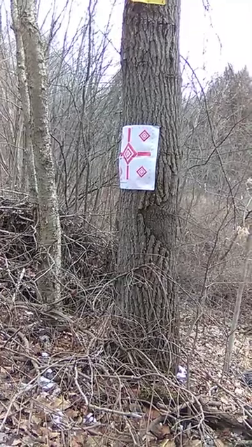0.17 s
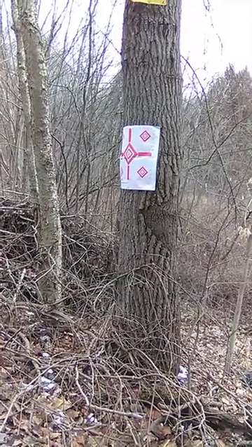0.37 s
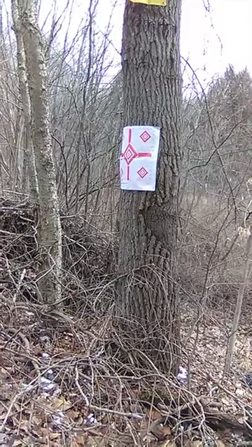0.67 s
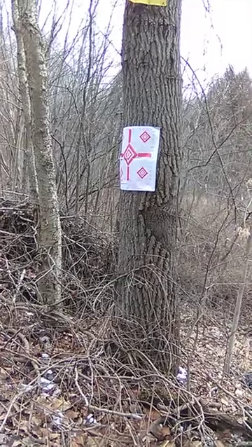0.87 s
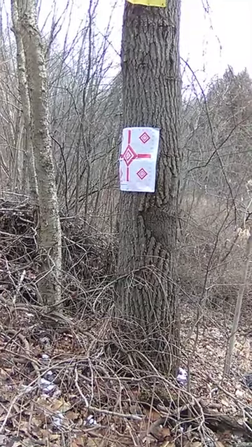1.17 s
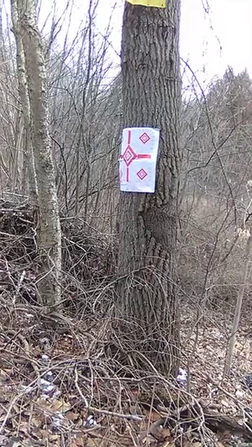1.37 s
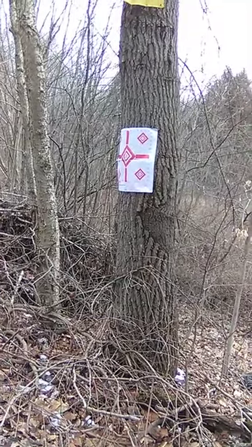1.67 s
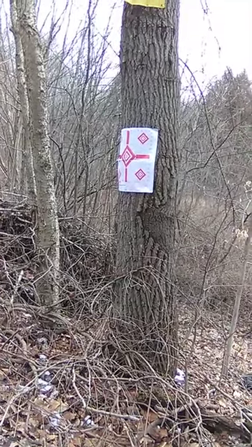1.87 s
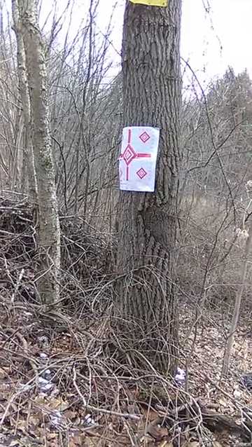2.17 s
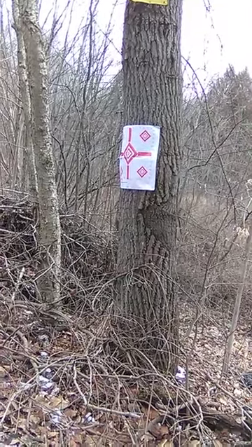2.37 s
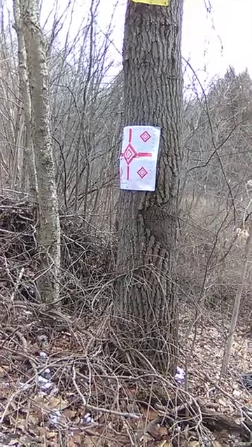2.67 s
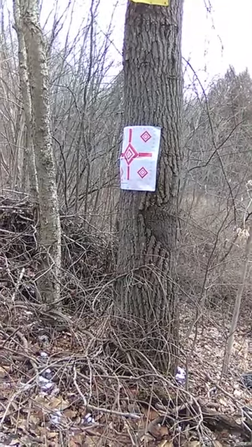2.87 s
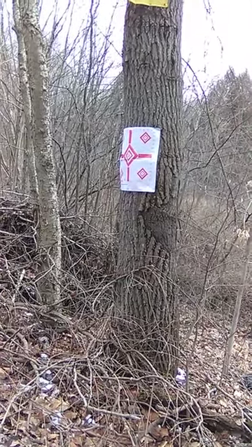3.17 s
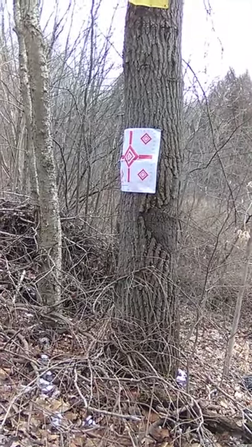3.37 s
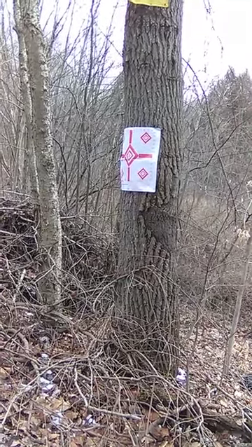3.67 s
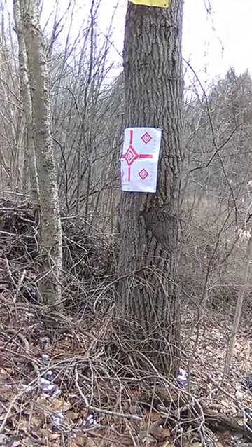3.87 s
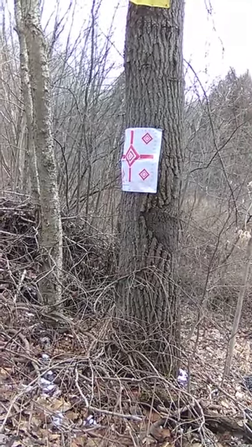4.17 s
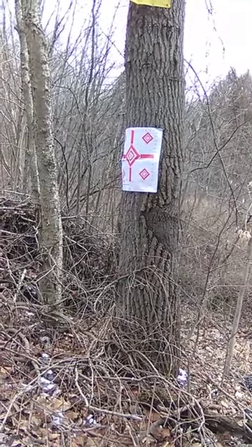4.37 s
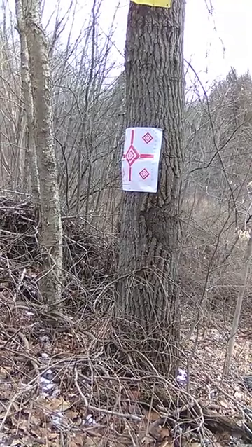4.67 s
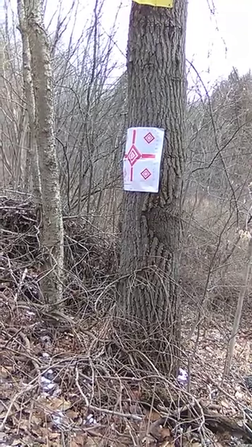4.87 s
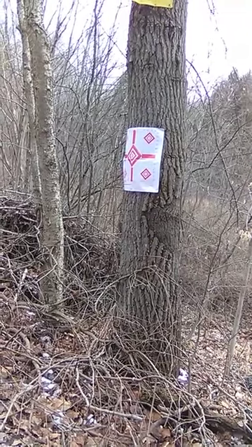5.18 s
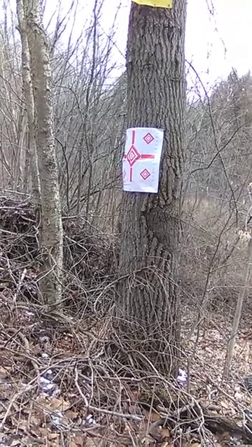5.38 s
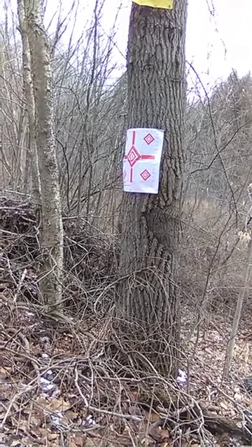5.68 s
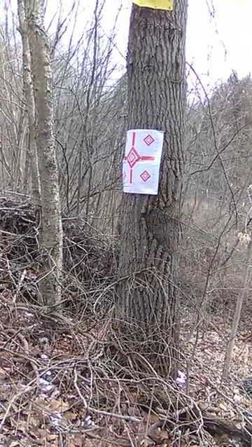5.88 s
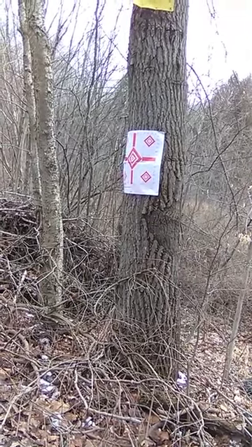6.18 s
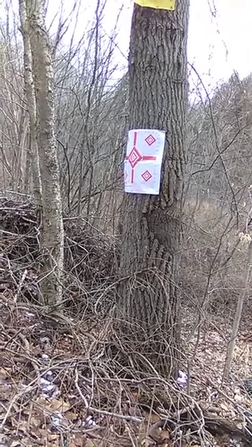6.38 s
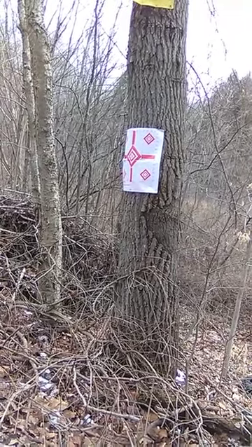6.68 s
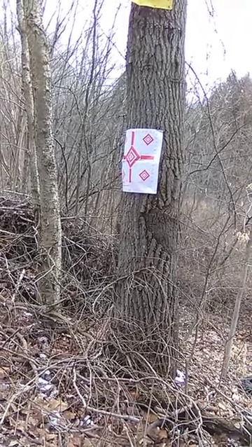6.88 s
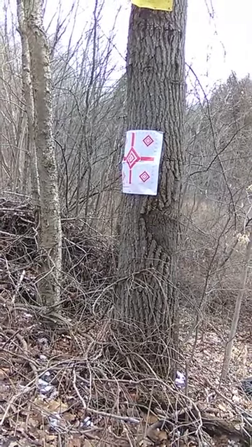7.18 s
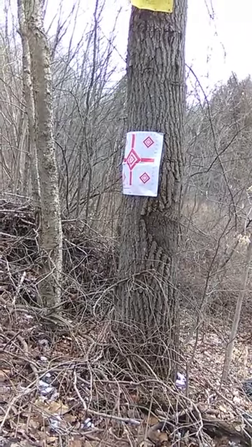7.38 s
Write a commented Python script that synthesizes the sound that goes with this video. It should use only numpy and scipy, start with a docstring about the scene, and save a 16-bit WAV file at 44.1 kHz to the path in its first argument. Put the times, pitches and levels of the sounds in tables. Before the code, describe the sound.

Outdoors, spaced air-pistol shots snap and spit gas, pellets crack on paper and bark, echoes scatter through trunks, and early wind rumbles against the microphone.

```python
"""The woods still echo an earlier shot; then a gas-powered air pistol fires at paper on a tree, near a small camera.
Each shot is a hammer rush, valve puffs of ringing and hiss, mostly a pellet smack, then noise tails off the trunks.
Trigger and action click between shots; early on something lands in dry leaves and later there is one dull tap.
Lumpy low noise buffets mostly the left port and largely dies down after 4.3 s; the loudest peaks overload.
Throughout, faint air stirs, a far tone wavers and the camera electronics whine on and off."""
import sys
import numpy as np
from scipy import signal
from scipy.fft import rfft, irfft, next_fast_len
from scipy.io import wavfile
from scipy.ndimage import uniform_filter1d

SR = 44100
rng = np.random.default_rng(int(sys.argv[2]) if len(sys.argv) > 2 else 0)


def amplitude_ratio(level_db):
    """Convert a level in decibels to the matching linear amplitude (field) ratio."""
    exponent = np.asarray(level_db, float) / 20
    return 10 ** exponent


def pcm_store(signal):
    """Save signal as 16-bit PCM."""
    levels = np.round(np.clip(np.atleast_2d(signal), -1, 1) * 32767)
    wavfile.write(sys.argv[1], SR, levels.astype(np.int16).T)


N = 332514
LEAD_S = .2  # rendered before time zero, for the echo of an earlier shot
LONG = N + round(LEAD_S * SR)


def evened(x):
    """Scales to rms 1."""
    return x / np.sqrt(np.mean(x ** 2) + 1e-20)


def smooth_noise(shape, size):
    """Moving average of white noise, at rms 1."""
    return evened(uniform_filter1d(rng.standard_normal(shape), size=size))


def read(points, hz):
    """Reads a spectrum table on a log frequency axis."""
    f, value = np.transpose(points)
    return np.interp(np.log(hz + 1), np.log(f + 1), value)


def add(mix, s, sound):
    """Adds a two-channel sound at time s."""
    part = mix[:, round((s + LEAD_S) * SR):][:, :sound.shape[1]]
    part += sound[:, :part.shape[1]]


def panned(db):
    """Gains of the two ports for a left-right level difference."""
    return amplitude_ratio(np.multiply.outer([.5, -.5], db))


def hiss(size, colour, treble_db=0, balance=None, alike=None):
    """Two-port noise of a given spectrum at rms 1; the treble tilt is half reached at 3.4 kHz."""
    # port level difference: freq_hz, left_minus_right_db
    ports = [(200, -2), (1270, 5), (2330, 5), (4300, 3), (7910, -7), (14600, 1)]
    # port correlation: freq_hz, likeness (-1..1)
    likeness = [(400, .92), (800, 0.23), (1400, 0)]
    balance = ports if balance is None else balance
    alike = likeness if alike is None else alike
    fast = next_fast_len(size)
    hz = np.fft.rfftfreq(fast, 1 / SR)
    left, other = rfft(rng.standard_normal((2, fast)))
    same = np.clip(read(alike, hz), -1, 1)
    pair = np.array([left, same * left + np.sqrt(1 - same ** 2) * other])
    tilt_db = treble_db * hz ** 4 / (hz ** 4 + 3400.0 ** 4)
    gain = amplitude_ratio(read(colour, hz) + tilt_db) * panned(read(balance, hz))
    return evened(irfft(pair * gain, fast)[:, :size])


def blow(t, t60, rise):
    """Envelope: a 60 dB swell in rise s up to t = 0, then exponential decay."""
    return amplitude_ratio(np.where(t < 0, 60 * t / rise, -60 * t / t60))


def ring(t, hz, t60):
    """A damped mode that starts at t = 0."""
    return (t > 0) * amplitude_ratio(-60 * abs(t) / t60) * np.sin(2 * np.pi * hz * t)


def shot():
    """Hammer rush, then valve puffs: each a low push, a barrel ring and a jet of hiss."""
    # hammer bounces on the valve: after_s, push_db, barrel_ring_db, hiss_db
    puffs = [(.0004, -18, -6.5, -7), (.0022, -12, -11, -10), (.0076, -7.5, -10, -8), (0.013, -8, -9, -8),
             (.0184, -21, -17, -14.5)]
    # jet spectrum: freq_hz, relative_db_per_hz
    jet = [(150, -20), (300, -2.5), (520, -4), (620, -14), (1300, -4), (1930, -2), (2560, -8), (3760, -.4),
           (5660, -6), (9110, -5), (12200, -16.5), (14200, -15), (15000, -32)]
    push_hz, push_t60_s = 390, .012
    barrel_hz, barrel_t60_s = 790, .022
    thump_hz, thump_t60_s = 145, .05
    t = np.arange(4096) / SR - .01
    at = t - np.array([[0], [.00015]])  # the left port is nearer
    body, jet_power = 0, 0
    for s, push_db, barrel_db, hiss_db in puffs:
        push = amplitude_ratio(push_db) * ring(at - s, push_hz, push_t60_s)
        barrel = amplitude_ratio(barrel_db) * panned(2.1)[:, None] * ring(at - s, barrel_hz, barrel_t60_s)
        body = body + push + barrel
        jet_power = jet_power + (amplitude_ratio(hiss_db) * blow(t - s, .045, .002)) ** 2
    rush = amplitude_ratio(-16) * blow(t, .03, .012) * np.clip((t + .005) / .003, 0, 1)
    scatter = amplitude_ratio(-12) * blow(t - .012, .14, .02)  # nearby trunks and ground fill in behind the puffs
    thump = amplitude_ratio(-19) * ring(at, thump_hz, thump_t60_s)
    shape = np.sqrt(jet_power + rush ** 2 + scatter ** 2)
    return thump + body + shape * hiss(len(t), jet, 1.5)


def smack(db, treble_db):
    """Pellet on target: a crack on the paper, then its rattle and the bark crumbs, as decaying noise."""
    # impact spectrum: freq_hz, relative_db_per_hz
    spectrum = [(410, -44), (1200, -16), (1930, -.5), (2600, -8), (3900, -1.5), (8210, -10), (15000, -40)]
    t = np.arange(4096) / SR - .002
    crack = blow(t, .018, 0.0025)
    rattle = amplitude_ratio(-5.5) * blow(t, .11, 0.0051)
    return amplitude_ratio(db) * (crack + rattle) * hiss(len(t), spectrum, treble_db)


def click(db, treble_db, scrape_t60_s=.09):
    """A snap and a short scrape through the resonances of the pistol frame, left of the camera."""
    # frame resonances: centre_hz (before the random shift), width_hz, level_db
    frame = [(1426, 490, -5), (1804, 300, -0.5), (3490, 1000, 1), (5060, 990, -3.5), (7170, 2300, -5),
             (9530, 1400, -9)]
    t = np.arange(4096) / SR - .002
    hz = np.geomspace(100, 16000, num=200)
    shift = rng.uniform(.9, 1.1)  # each click has slightly shifted resonances, drawn at random
    power = sum(amplitude_ratio(d) ** 2 / (1 + (2 * (hz - shift * f) / w) ** 2) ** 1.2 for f, w, d in frame)
    power = power / (1 + (1150 / hz) ** 6)  # bass cut
    colour = np.c_[hz, 10 * np.log10(power)]
    grain = amplitude_ratio(4.0 * smooth_noise(len(t), 60))  # the scrape catches and slips
    snap = 1.2 * blow(t, .018, .002)
    scrape = amplitude_ratio(-3.5) * grain * blow(t - .004, scrape_t60_s, .03) * (t > -.001)
    return amplitude_ratio(db) * (snap + scrape) * hiss(len(t), colour, treble_db, [(2000, 7.5), (8000, 2.5)])


def sear(db):
    """The sear lets go: a dull ring of the frame modes with a faint snap on top."""
    # frame modes: freq_hz, level_db, t60_s
    modes = [(780, -9, .025), (1250, -3, .016), (1650, 0, .018)]
    t = np.arange(4096) / SR - .002
    knock = sum(amplitude_ratio(d) * ring(t, hz, t60) for hz, d, t60 in modes) * np.clip(t / .0008, 0, 1)
    return amplitude_ratio(db) * (panned(7)[:, None] * knock + click(-9.5, -10.5, .07))


def rustle():
    """Something lands in dry leaves: a dull knock, then grainy noise that swells, sags and dies away."""
    # leaf spectrum: freq_hz, relative_db_per_hz
    leaves = [(400, -20), (1600, -11), (3400, -2), (5600, -2), (8000, -9), (14000, -30)]
    # knock modes: freq_hz, relative_db, t60_s
    modes = [(720, -2, .08), (1650, -8, .06)]
    level_db, length_s, t60_s = -22, .036, .18
    t = np.arange(16384) / SR
    grain = evened(amplitude_ratio(3.5 * smooth_noise(len(t), 40)))
    arch = amplitude_ratio(-5.0 * (t / (.45 * length_s) - 1) ** 2)
    tail = .4 * blow(t - length_s, t60_s, 1)
    shape = np.minimum(t / 0.0012, 1) * np.where(t < length_s, arch, tail)
    knock = sum(amplitude_ratio(d) * ring(t, hz, mode_t60_s) for hz, d, mode_t60_s in modes)
    return amplitude_ratio(level_db) * (shape * grain * hiss(len(t), leaves) + knock)


def dull_tap():
    """A single damped mode, equal at both ports."""
    return amplitude_ratio(-29) * ring(np.arange(2048)[None] / SR, hz=700, t60=.016)


def woods(x):
    """Scatter from many trunks: noise tails whose bands die at their own speed."""
    # tail decay: freq_hz, t60_s
    decay = [(300, .5), (800, .8), (1900, .82), (4590, .62), (12000, .46)]
    # tail spectrum: freq_hz, relative_db
    strength = [(400, -23), (1200, -18), (1900, -19), (2600, -13), (3800, -16), (9000, -20), (14000, -21)]
    turn = np.arange(LONG) / SR * 1.4  # rad; the mix of tails turns slowly, so each sound echoes differently
    out = 0
    for k in range(3):
        hz, t, z = signal.stft(hiss(SR, [(1, 0)]), SR, nperseg=256)
        tail_db = -60 * t / read(decay, hz)[:, None] + read(strength, hz)[:, None]
        z = z * amplitude_ratio(tail_db) * np.clip(t / 0.028, 0, 1)
        tail = signal.istft(z, SR, nperseg=256)[1] / 50
        share = np.sqrt(2 / 3) * np.cos(turn + k * np.pi / 3)
        out = out + signal.fftconvolve((share * x.mean(0))[None], tail, axes=1)[:, :LONG]
    return out


def slap(edge_db, lump_db):
    """A single eddy pushes the left port suddenly: a soft edge, then a few slow swings."""
    t = np.arange(6144) / SR - .002
    lump = amplitude_ratio(lump_db) * ring(t, hz=80, t60=.11) * np.clip(t / .01, 0, 1)
    edge = amplitude_ratio(edge_db) * ring(t, hz=200, t60=.04)
    soften = signal.butter(4, 600, fs=SR, output="sos")
    return -2 * signal.sosfilt(soften, lump + edge) * np.array([[1], [0]])


def wind():
    """Lumps of low pressure, almost unrelated at the two ports; crests of strong lumps reach higher in pitch."""
    # steady breeze: time_s, left_db, right_db
    breeze = [(0, -25, -48), (.7, -30, -32), (1.2, -28, -39), (1.6, -31, -30), (2.1, -35, -52),
              (3.0, -28, -33), (4.2, -31, -39), (4.3, -46, -46), (4.73, -62, -40), (4.78, -62, -58),
              (5.2, -60, -60), (6.2, -58, -45), (7.0, -60, -60)]
    # gusts on the left port: start_s, length_s, level_db
    gusts = [(.13, .32, -19), (.68, .41, -18), (1.14, .13, -18), (1.34, .08, -16), (1.88, .17, -18),
             (2.25, .46, -21), (2.97, .1, -19.5), (3.39, .2, -22), (3.83, .29, -21), (4.88, .19, -38),
             (5.23, .15, -29), (5.44, .13, -37), (5.81, .04, -38), (6.15, .03, -40)]
    # buffet spectrum: freq_hz, relative_db_per_hz
    buffet = [(22, -34), (53, 1.5), (80, 2.5), (204, -15.5), (600, -40), (1200, -100)]
    gust_rise_s, gust_t60_s = .12, .2  # a gust swells 60 dB in the rise time, holds, then dies away
    t = np.arange(LONG) / SR - LEAD_S
    times, *ports_db = np.transpose(breeze)
    level = amplitude_ratio(np.array([np.interp(t, times, db) for db in ports_db]))
    for s, length, db in gusts:
        gust = amplitude_ratio(db) * blow(t - np.clip(t, s, s + length), gust_t60_s, gust_rise_s)
        level[0] = np.maximum(level[0], gust)
    lumps = evened(uniform_filter1d(uniform_filter1d(rng.standard_normal((2, LONG)), size=1200), size=1200))
    air = hiss(LONG, buffet, 0, [(1, 0)], [(1, .1)])
    low = signal.sosfilt(signal.butter(2, 140, fs=SR, output="sos"), air)
    swell = low * evened(amplitude_ratio(1.5 * lumps))
    crests = evened(uniform_filter1d(swell ** 2, size=200) ** .85)
    whip = (air - low) * np.minimum(crests, 3.8) * (level / amplitude_ratio(-23)) ** .55
    return level * 3.5 * np.tanh((swell + whip) / 3.5)  # the tallest lumps are gently rounded off


def distant_air():
    """Faint coloured noise whose level drifts."""
    # air spectrum: freq_hz, relative_db_per_hz
    spectrum = [(90, -30), (150, -10), (400, -19), (850, -14), (1300, -28), (1950, -29), (2600, -36),
                (8200, -33), (14000, -40)]
    drift = amplitude_ratio(2.2 * smooth_noise(LONG, 4000))
    return amplitude_ratio(-67.5) * drift * hiss(LONG, spectrum)


def far_tone():
    """A far wavering tone: noise in a narrow band, nearly alike at both ports."""
    hz, width_hz, level_db = 669, 11, -75
    band = [(hz - 5 * width_hz, -60), (hz - width_hz, -6), (hz, 0),
            (hz + width_hz, -6), (hz + 5 * width_hz, -80)]
    return amplitude_ratio(level_db) * hiss(LONG, band, alike=[(1, .9)])


def electronics_whine():
    """Two flickering tones, mostly at the right port, that hold for spells and otherwise blip steadily."""
    # tones: freq_hz, rms_db (before flicker and panning)
    whine = [(8000, -82.5), (14002, -83)]
    # spells when the whine holds: on_s, off_s
    busy = [(0, .1), (.39, .72), (2.83, 3.32), (4.24, 5.28)]
    blip_every_s, blip_s, first_blip_s = .32, .025, .07
    t = np.arange(LONG) / SR - LEAD_S
    spells = [(t > a) & (t < b) for a, b in busy]
    blips = (t - first_blip_s) % blip_every_s < blip_s
    on = uniform_filter1d(1. * np.any(spells + [blips], axis=0), size=300)
    flicker = amplitude_ratio(3.5 * smooth_noise(LONG, 900))
    tones = sum(amplitude_ratio(d) * np.sqrt(2) * np.sin(2 * np.pi * f * t) for f, d in whine)
    return on * flicker * tones * panned(-20)[:, None]


def scene():
    """Pistol, target and leaves sound into the woods; slaps, wind and background lie on top."""
    # shots: time_s
    shots = [-.09, .673, 1.4474, 2.1814, 2.957, 3.7709, 6.3501, 7.107]
    # pellet on paper and bark: time_s, level_db, treble_db
    smacks = [(0.7133, -9, 1.5), (1.49, -14, .4), (2.2239, -11, 4.5), (2.9999, -14.5, -1.5),
              (3.8133, -10, -2.1), (6.3941, -11, -4)]
    # trigger and action, and the crackle on the dull tap at 2.548 s: time_s, level_db, treble_db
    clicks = [(0.2463, -39.5, -8.5), (0.3287, -60, 8), (.5377, -55, -8), (0.5636, -38.5, -7),
              (0.9073, -39, -7), (1.3149, -38, -7.5), (1.6985, -39.5, -6), (2.0293, -44, -4.5),
              (2.0517, -37, -10.5), (2.4289, -40.5, -8.5), (2.548, -47, -10), (2.824, -54, -3.5),
              (2.8923, -38, -9.5), (3.2725, -39.5, -8.5), (3.4361, -52, -15.5), (3.6406, -28, -3.5),
              (3.7179, -38, -5), (3.9953, -32.5, -6), (4.0367, -41, -6.5), (4.0701, -37.5, -16.5),
              (4.4514, -56, 6), (4.4727, -46.5, 11.5), (4.5121, -35.5, -9), (4.6992, -58, -3.5),
              (6.7326, -39.5, -11), (6.7735, -40, -6), (6.9686, -51, .1), (7.0444, -38.5, -8.5),
              (7.4859, -40.5, -8.5)]
    # sear releases: time_s, level_db
    sears = [(1.4257, -20), (2.169, -21), (2.9342, -20), (3.7519, -15), (4.7591, -24), (7.0843, -19)]
    # eddies on the left port: time_s, edge_db, lump_db (both before doubling)
    slaps = [(1.254, -15, -17), (1.544, -10, -11), (1.837, -22, -3.5), (1.962, -20, -18), (2.665, -16, -15),
             (2.872, -22, -6.5), (3.208, -21, -13), (3.907, -20, -12)]
    loud, small, port = np.zeros((3, 2, LONG))
    for s in shots:
        add(loud, s - .01, shot())  # each sound starts ahead of its own t = 0
    layers = ((loud, smacks, smack), (small, clicks, click), (small, sears, sear), (port, slaps, slap))
    for mix, rows, source in layers:
        for s, *row in rows:
            add(mix, s - .002, source(*row))
    add(loud, 1.8015, rustle())
    add(small, 2.548, dull_tap())
    echo = woods(loud + amplitude_ratio(-4) * small)  # small clicks reach the trunks less than the blast
    background = distant_air() + far_tone() + electronics_whine()
    return (loud + small + echo + port + wind() + background)[:, -N:]


def band_limit(x):
    """A steep low-pass at the top of the band."""
    return signal.sosfilt(signal.butter(12, 15160, fs=SR, output="sos"), x)


def record(dry):
    """The microphone cuts the deepest bass, the input overloads at full scale, then the band is limited."""
    bass_cut = signal.butter(3, 40, "high", fs=SR, output="sos")
    heard = np.clip(signal.sosfilt(bass_cut, dry), -1, 1)
    heard = signal.oaconvolve(heard, signal.firwin(255, 14400, fs=SR)[None], "same")
    return band_limit(heard)


dry = scene()
out = record(dry)
pcm_store(out)
```